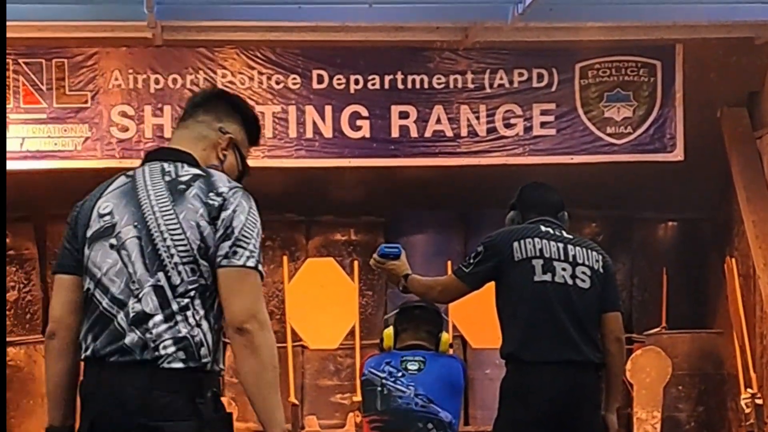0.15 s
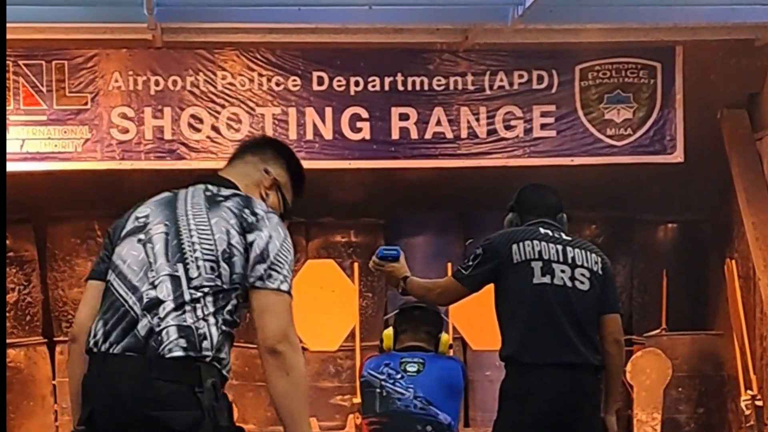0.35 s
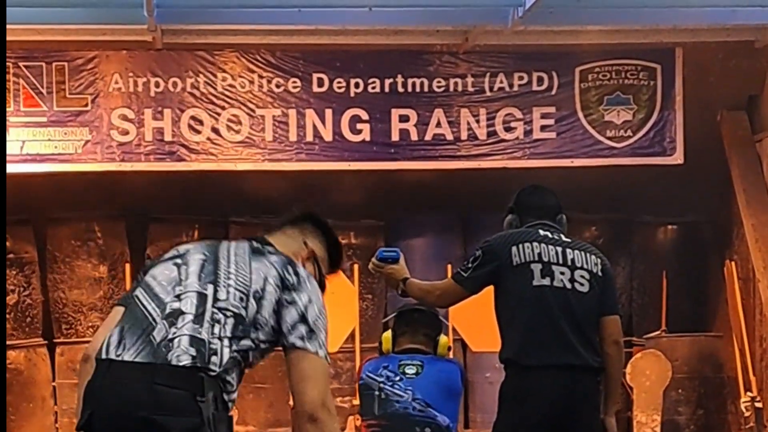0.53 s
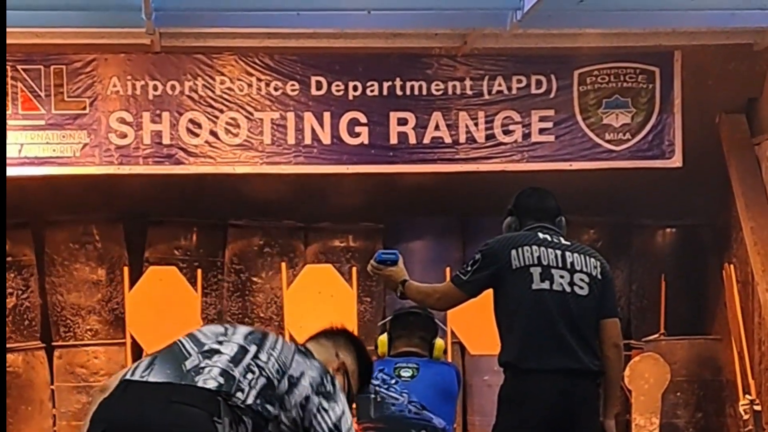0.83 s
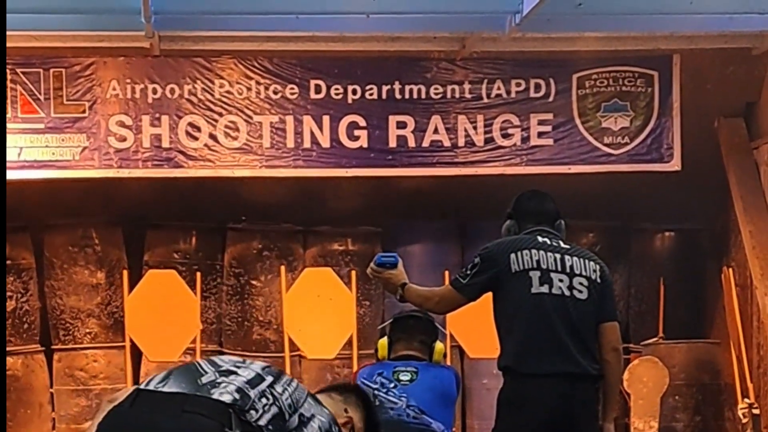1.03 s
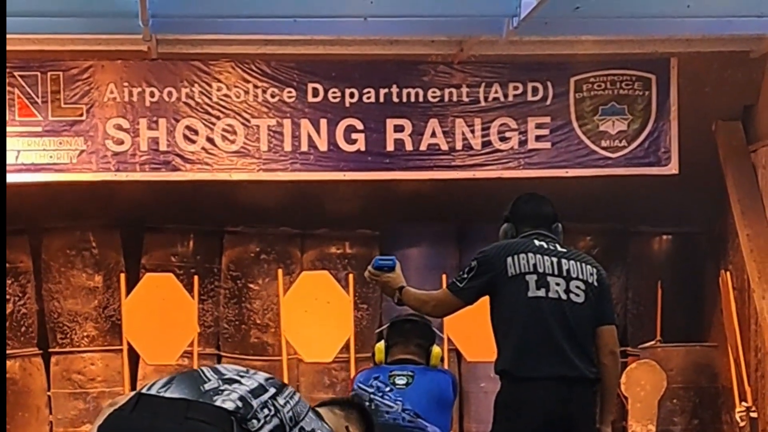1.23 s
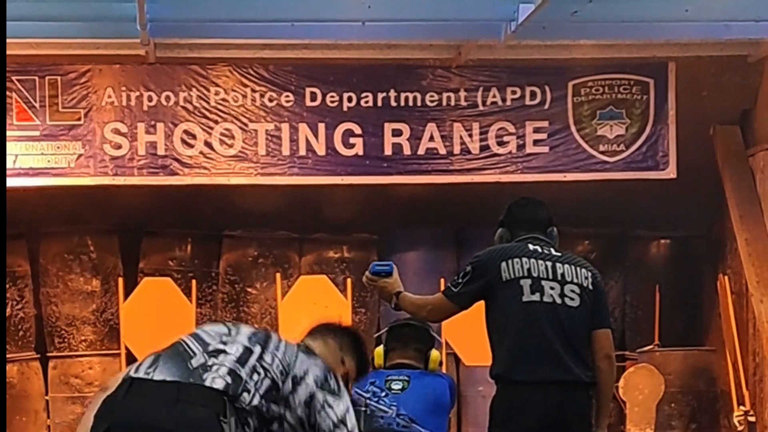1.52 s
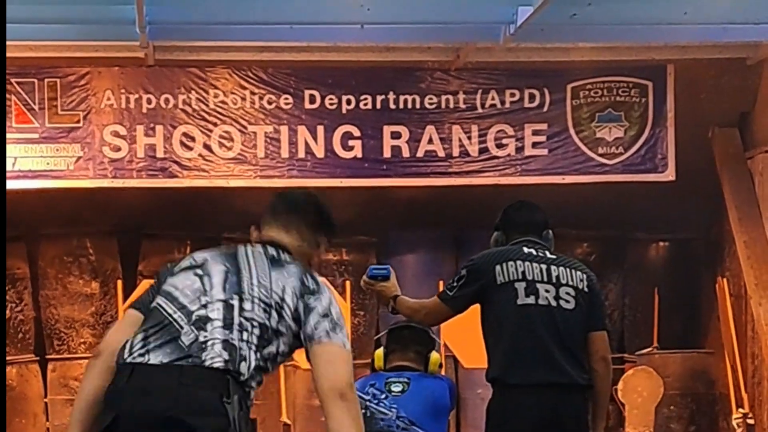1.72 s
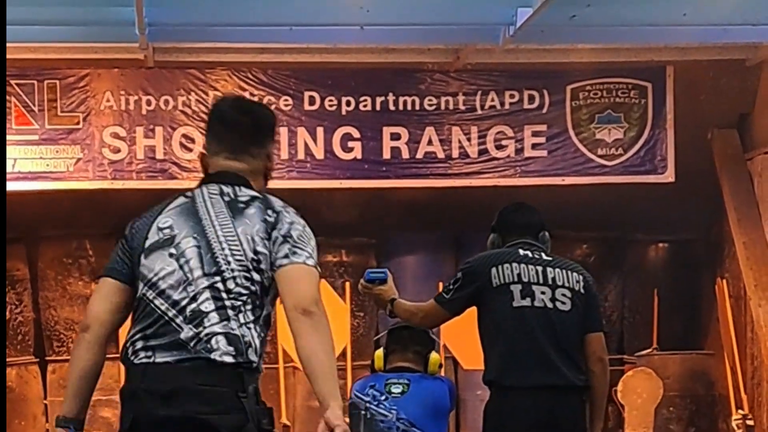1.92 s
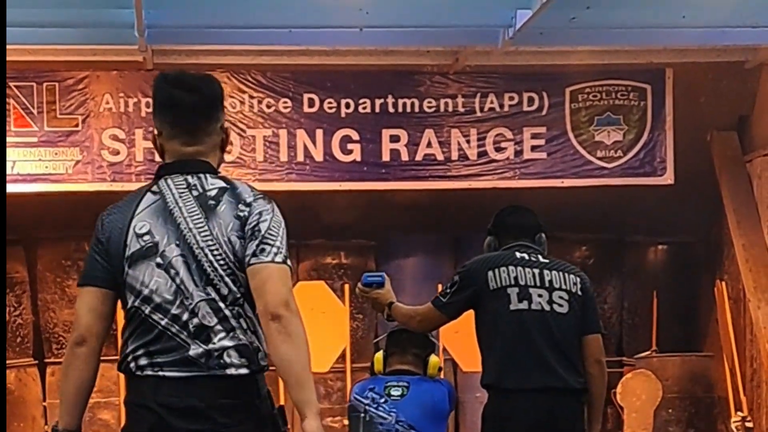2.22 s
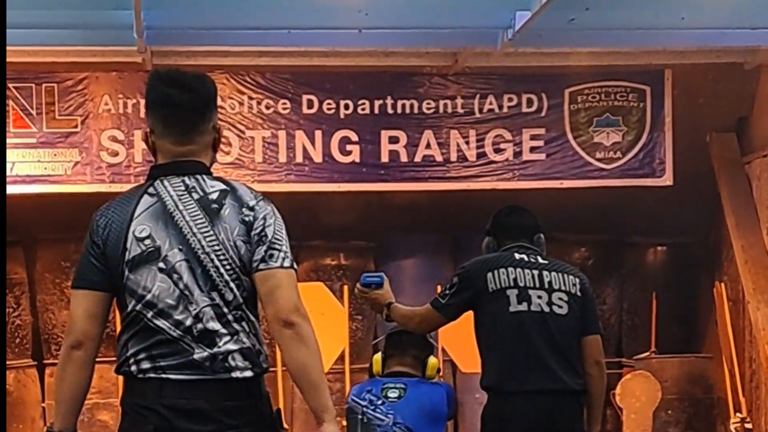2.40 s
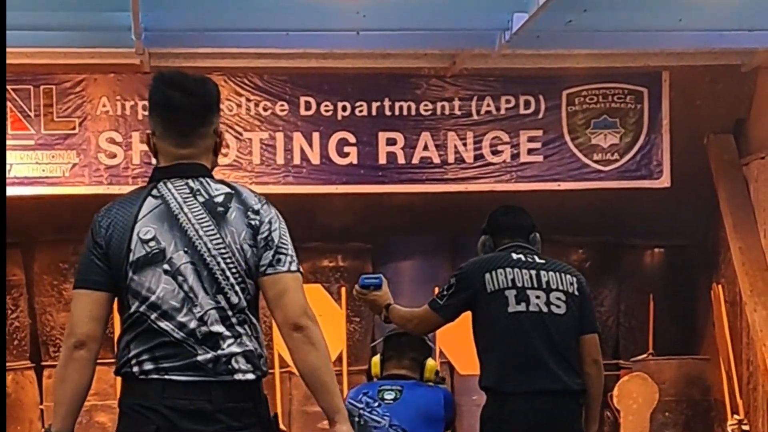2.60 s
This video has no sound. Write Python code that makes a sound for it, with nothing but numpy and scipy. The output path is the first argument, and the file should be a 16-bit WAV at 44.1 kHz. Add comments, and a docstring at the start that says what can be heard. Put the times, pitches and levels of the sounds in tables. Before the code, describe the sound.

Four loud pistol shots crack out in a hard-walled indoor range, each with a booming echo

```python
"""Four pistol shots in a hard-walled indoor range, heard from a few metres behind the shooter.
Each muzzle blast is a pressure pulse with wall echoes, a bright noise crack and a low noise thump.
Shaped noise and ringing lane resonances fill the room: the bass repeats, the treble is new each time.
Two metallic pings colour the second attack; ventilation noise and a motor hum run underneath.
The blasts overload the microphone and a limiter holds them down."""
import sys
import numpy as np
from scipy import signal
from scipy.fft import rfft, irfft, next_fast_len
from scipy.io import wavfile
from scipy.ndimage import uniform_filter1d

SR = 44100
rng = np.random.default_rng(int(sys.argv[2]) if len(sys.argv) > 2 else 0)


def store_wav(level_fs):
    """Save 16-bit WAV to argv[1]."""
    pcm = np.round(np.clip(np.atleast_2d(level_fs), -1, 1) * 32767)
    wavfile.write(sys.argv[1], SR, pcm.T.astype(np.int16))


N = 121275  # scene length in samples

# Levels within a spectrum are relative; left-right values are left over right.
# Ventilation colour as heard after the microphone: (frequency [Hz], level [dB])
VENT_COLOUR = [(15, -34), (25, -8), (59, -8.5), (92, -7), (123, -9.5), (200, -15), (280, -10), (600, -17.5),
               (1200, -21.5), (1840, -28.5), (2840, -33.5), (6740, -35.5), (8830, -48), (11900, -34.5),
               (16000, -58)]
# Ventilation stereo balance after the microphone: (frequency [Hz], left-right [dB])
VENT_BALANCE = [(100, -.5), (600, 1.5), (1300, -5), (4400, -4.5), (15000, -11.5)]
# Pistol shots: (time [s], level [dB], extra crack level [dB], extra thump level [dB])
SHOTS = [(.2342, 4, 0, 2), (0.9416, 3.23, -0.5, 1.5), (1.787, 3.5, 4, 3.5), (2.2153, 3, 0, -1.5)]
# Distinct wall echoes: (delay after the blast [s], level against the blast [dB], left-right [dB])
ECHOES = [(.0052, -12, 25), (0.026, 2, 7), (0.058, 3, 11), (0.111, 1.5, -2), (0.156, -13, -17)]
# Bright scatter from the booth: (frequency [Hz], level [dB])
CRACK_COLOUR = [(100, -6.5), (500, -14.5), (1500, 0.5), (4000, -1.5), (8000, 0.5), (16000, -13)]
# Pressure wave buffeting the microphone ports: (frequency [Hz], level [dB])
THUMP_COLOUR = [(15, -25), (30, -7), (48, -6), (75, -5.5), (120, -8), (250, -18), (1000, -47.5)]
# Reverberation colour: (frequency [Hz], level [dB])
ROOM_COLOUR = [(25, -47.5), (50, -25), (80, -23), (125, -15.5), (200, -10), (300, -5), (370, -2),
               (600, -1.5), (800, -2.5), (1150, -2), (1600, -9), (2100, -14), (2700, -11), (3500, -17),
               (5500, -15), (8000, -14), (12000, -17.5), (16000, -28.5)]
# Reverberation time: (frequency [Hz], time to fall 60 dB [s])
ROOM_T60 = [(60, 1.11), (170, 1.055), (300, 0.97), (600, 0.81), (1300, 0.69), (3000, 0.62), (6000, 0.67),
            (11000, 0.55), (16000, 0.41)]
# Midrange bloom from the firing lane's walls: (frequency [Hz], level [dB])
BLOOM_COLOUR = [(100, -34), (300, -13.5), (550, -4), (800, 0), (1150, 3.5), (1700, -10.5), (3000, -12.5),
                (16000, -23.5)]
# Power share of the room noise common to all shots: (frequency [Hz], share [0-1])
SHARED_ROOM = [(100, 1), (400, 0.95), (1000, 0.86), (3000, 0.21), (10000, 0.033)]
# Left-right likeness of diffuse sound: (frequency [Hz], correlation [0-1])
LIKENESS = [(60, 1), (125, 0.96), (220, 0.95), (380, 0.77), (700, 0.46), (1300, 0.052), (4000, 0)]
# Early resonances of the firing lane: (frequency [Hz], level [dB])
LANE_MODES = [(76, -7.5), (382, 4), (407, 2.5), (468, 5), (507, -7), (588, 3), (662, -9.5), (768, -1),
              (783, 12.5), (820, 8), (893, -7.5), (975, -19.5), (1112, -23), (1180, 4), (1550, -12.5)]
# Brief metallic pings inside the attack: (time [s], frequency [Hz], level [dB])
PINGS = [(0.9418, 3020, -1.5), (.951, 4330, 2)]
# Microphone colour: (frequency [Hz], gain [dB])
MIC_COLOUR = [(15, -31.5), (30, -21), (50, 1), (1000, -3.5), (4000, 0), (6800, -1), (8000, -7.5),
              (9800, -5.5), (12000, 3), (14000, -1), (16000, -1)]
# Microphone stereo balance: (frequency [Hz], left-right [dB])
MIC_BALANCE = [(60, -0.5), (200, -1.1), (700, -1), (1300, -4.5), (2400, -3.1), (4400, -7), (8000, -4),
               (15000, -14)]

VENT_DB = -51
HUM_HZ, HUM_DB = 118.5, -61.5  # fan motor, rms level into the microphone
BLAST_S, BLAST_DB = 0.0006, 2  # time to the pulse's zero crossing, its peak within the shot
CRACK_DB, CRACK_T60_S = -8, 0.17
THUMP_DB, THUMP_S, THUMP_PAN_DB = -19.5, 0.068, 3.5  # level, length, left-right
ROOM_DB, BUILD_S = -1, 0.0098  # tail level, time constant of the room's build-up
BLOOM_DB, BLOOM_PEAK_S = -5.5, 0.035
MODES_DB, MODES_T60_S = -18, 0.39
PING_T60_S = 0.02
OVERLOAD, KNEE = 1.4, 2.5  # amplitude the overload flattens towards, hardness of the bend
LIMIT_DB, LIMIT_S = -12, 0.015  # rms ceiling midway between the channels, averaging time
LIMIT_PAN_DB = 2.5  # left ceiling over right
LIMIT_RATIO = 6  # input dB per output dB well above the ceiling
TOP_HZ = 15900


def amp(db):
    """Decibels to gain."""
    return 10 ** (np.asarray(db) / 20)


def unit(x):
    """Scale to rms 1."""
    return x / np.sqrt(np.mean(x ** 2) + 1e-20)


def along(points, hz):
    """Read (frequency, value) points on a log frequency axis."""
    f, v = np.transpose(points)
    return np.interp(np.log(hz + 1), np.log(f + 1), v)


def sides(db):
    """Left and right gains for a level difference."""
    return amp(np.array([[0.5], [-0.5]]) * db)


def decay(t, t60):
    """Exponential fade that falls 60 dB in t60 seconds."""
    return np.exp(-np.log(1000) * t / t60)


def filtered(x, response):
    """Shape x by a response of frequency, with padding against wrap-around."""
    m = next_fast_len(x.shape[-1] + SR // 2)
    spectrum = rfft(x, m) * response(np.fft.rfftfreq(m, 1 / SR))
    return irfft(spectrum, m)[..., :x.shape[-1]]


def causal(gain):
    """The minimum-phase response with this gain, by folding its cepstrum."""
    cepstrum = irfft(np.log(gain))
    half = cepstrum.shape[-1] // 2
    cepstrum[..., 1:half] *= 2
    cepstrum[..., half + 1:] = 0
    return np.exp(rfft(cepstrum))


def add(track, s, sound):
    """Mix a sound in at time s."""
    i = max(round(s * SR), 0)
    track[:, i:i + sound.shape[-1]] += sound[..., :N - i]


def diffuse(white, colour):
    """Coloured stereo noise of rms 1, near mono in the bass, from a mid and a side signal."""
    def mid_side_gains(hz):
        turn = np.arccos(np.clip(along(LIKENESS, hz), -1, 1)) / 2
        return amp(along(colour, hz)) * [np.cos(turn), np.sin(turn)]

    mid, side = filtered(white, mid_side_gains)
    return unit(np.array([mid + side, mid - side]))


def ventilation():
    """Steady rush of the air handling as coloured noise, with a sine hum from the fan motor."""
    def before_mic(hz):
        # undo the microphone here, so the air has its own colour after it
        balance = along(VENT_BALANCE, hz) - along(MIC_BALANCE, hz)
        return sides(balance) / amp(along(MIC_COLOUR, hz))

    air = diffuse(rng.standard_normal((2, N + SR)), VENT_COLOUR)
    air = filtered(air, before_mic)[:, SR // 2:][:, :N]
    hum = np.sqrt(2) * np.sin(2 * np.pi * HUM_HZ * np.arange(N) / SR)
    return amp(VENT_DB) * air + amp(HUM_DB) * hum


def blast(t):
    """The muzzle's pressure pulse, a jump that decays through suction, and its distinct wall echoes."""
    pulse = amp(BLAST_DB) * (1 - t / BLAST_S) * np.exp(-t / BLAST_S)
    out = np.array([pulse, pulse])
    for delay, db, pan_db in ECHOES:
        add(out, delay, amp(db) * sides(pan_db) * pulse)
    return out


def crack(t):
    """Bright scatter from the booth: a short decaying burst of diffuse noise."""
    scatter = diffuse(rng.standard_normal((2, N)), CRACK_COLOUR)
    return amp(CRACK_DB) * scatter * decay(t, CRACK_T60_S)


def thump(t):
    """The pressure wave's short low buffet, independent noise at each microphone port."""
    push = unit(filtered(rng.standard_normal((2, N)), lambda hz: amp(along(THUMP_COLOUR, hz))))
    return amp(THUMP_DB) * sides(THUMP_PAN_DB) * push / (1 + (t / THUMP_S) ** 8)


def reverberation(t, walls):
    """Dense reflections as noise: an early bloom and a long tail with its own decay in each band."""
    share = lambda hz: np.clip(along(SHARED_ROOM, hz), 0, 1)
    common = filtered(walls, lambda hz: np.sqrt(share(hz)))
    fresh = filtered(rng.standard_normal((2, N)), lambda hz: np.sqrt(1 - share(hz)))
    white = common + fresh
    hz, s, bands = signal.stft(diffuse(white, ROOM_COLOUR), SR, nperseg=512)
    fade = decay(s, along(ROOM_T60, hz)[:, None])
    tail = amp(ROOM_DB) * signal.istft(bands * fade, SR)[1][:, :N]
    u = t / BLOOM_PEAK_S
    swell = (u * np.exp(1 - u)) ** 2
    # reversed in time, the same noise gives the bloom a different grain
    bloom = amp(BLOOM_DB) * diffuse(white[:, ::-1], BLOOM_COLOUR) * swell
    return tail + bloom


def standing_waves(t):
    """Resonances between the lane's walls: decaying sines that fade before the tail."""
    ring = np.zeros(len(t))
    phases = rng.uniform(0, 2 * np.pi, len(LANE_MODES))
    for (hz, db), phase in zip(LANE_MODES, phases):
        ring += amp(db) * np.sin(2 * np.pi * hz * t + phase)
    return amp(MODES_DB) * ring * decay(t, MODES_T60_S)


def pistol():
    """Each shot: blast, crack and thump, with the room swelling and dying away."""
    t, out = np.arange(N) / SR, np.zeros((2, N))
    walls = rng.standard_normal((2, N))
    direct, ring = blast(t), standing_waves(t)  # the same for every shot
    build = 1 - np.exp(-t / BUILD_S)
    for s, db, crack_db, thump_db in SHOTS:
        attack = direct + amp(crack_db) * crack(t) + amp(thump_db) * thump(t)
        room = (reverberation(t, walls) + ring) * build
        add(out, s, amp(db) * (attack + room))
    return out


def pings():
    """Short metallic rings inside the attack: sines with a fast decay."""
    t, out = np.arange(SR // 4) / SR, np.zeros((2, N))
    for s, hz, db in PINGS:
        add(out, s, amp(db) * np.sin(2 * np.pi * hz * t) * decay(t, PING_T60_S))
    return out


def scene():
    """Shots and pings over the ventilation."""
    return pistol() + pings() + ventilation()


def record(dry):
    """The microphone overloads and colours the sound; a limiter and a band limit follow."""
    bent = dry / (1 + np.abs(dry / OVERLOAD) ** KNEE) ** (1 / KNEE)
    hz = np.fft.rfftfreq(2 * N, 1 / SR)
    mic = causal(amp(along(MIC_COLOUR, hz)) * sides(along(MIC_BALANCE, hz)))
    wet = irfft(rfft(bent, 2 * N) * mic)[:, :N]
    power = uniform_filter1d(wet ** 2, max(int(LIMIT_S * SR), 1), axis=1)
    level = np.sqrt(np.abs(power))
    ceiling = amp(LIMIT_DB) * sides(LIMIT_PAN_DB)
    over = (1 + (level / ceiling) ** 4) ** (1 / 4)  # soft knee
    held = wet / over ** (1 - 1 / LIMIT_RATIO)
    band_limit = signal.cheby1(14, 0.3, TOP_HZ, fs=SR, output="sos")
    return signal.sosfilt(band_limit, np.clip(held, -1, 1))


dry = scene()
out = record(dry)
store_wav(out)
```